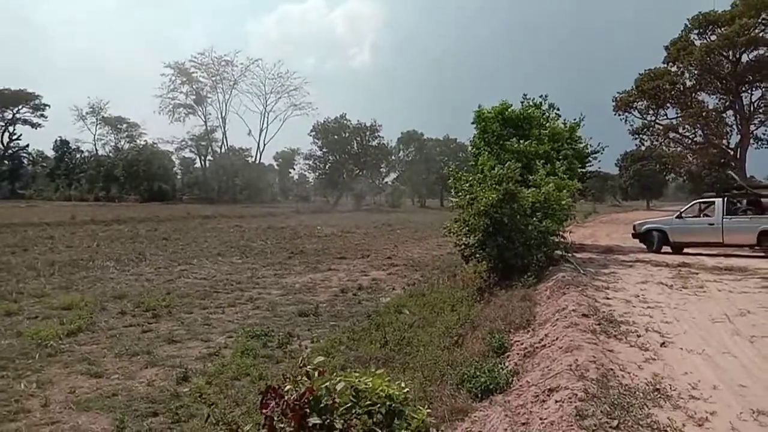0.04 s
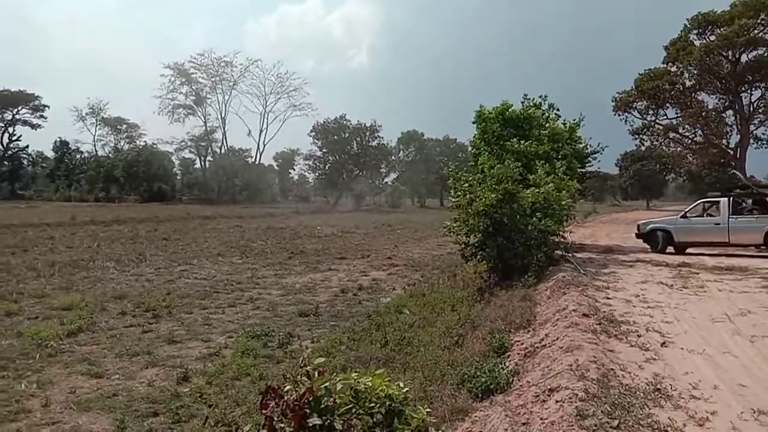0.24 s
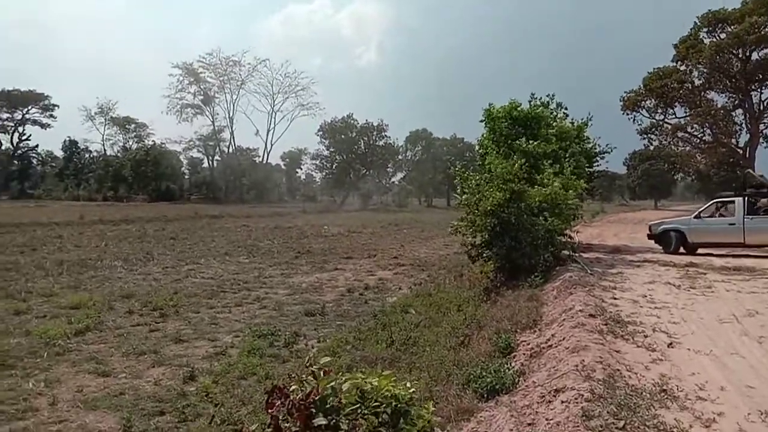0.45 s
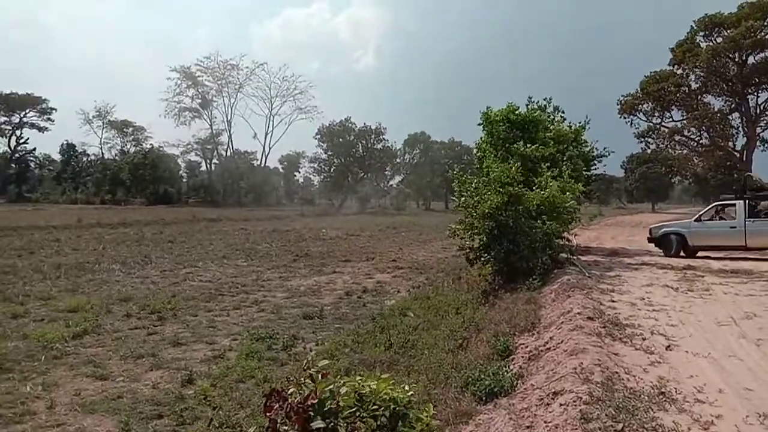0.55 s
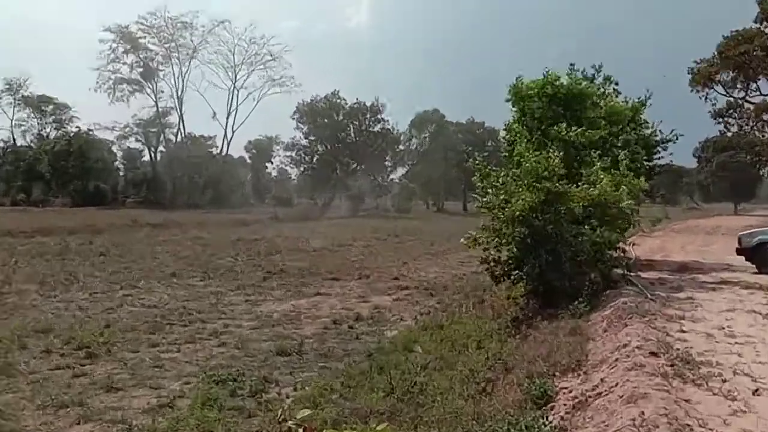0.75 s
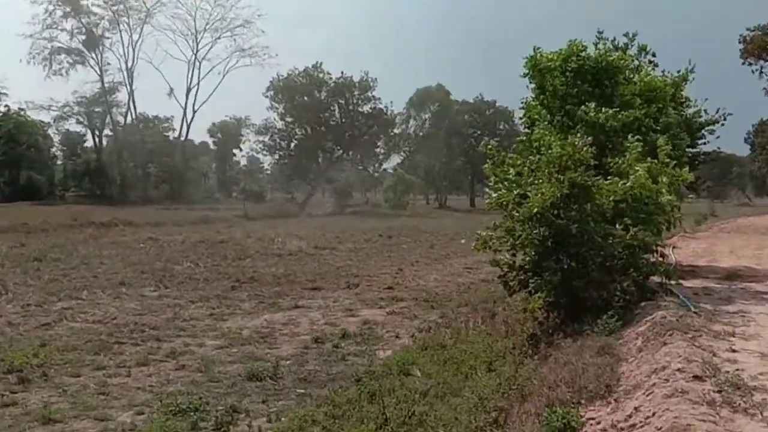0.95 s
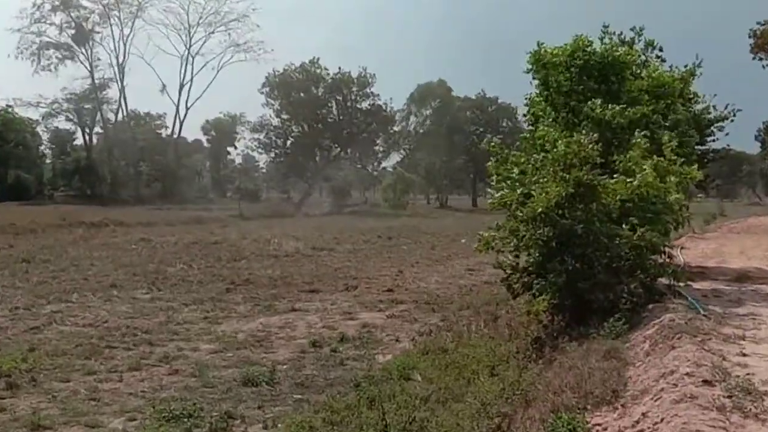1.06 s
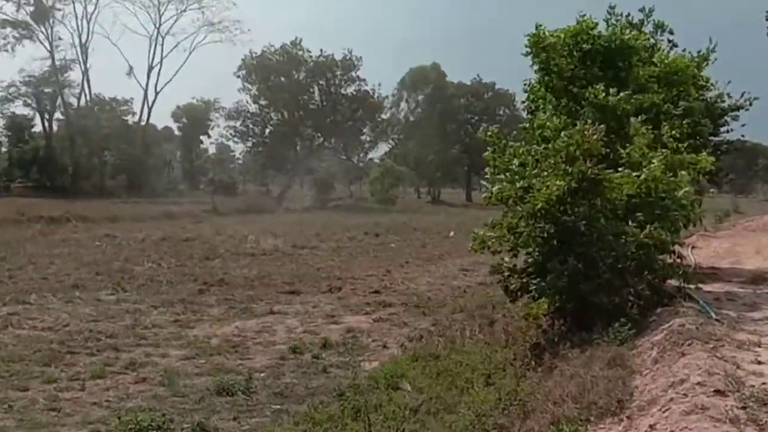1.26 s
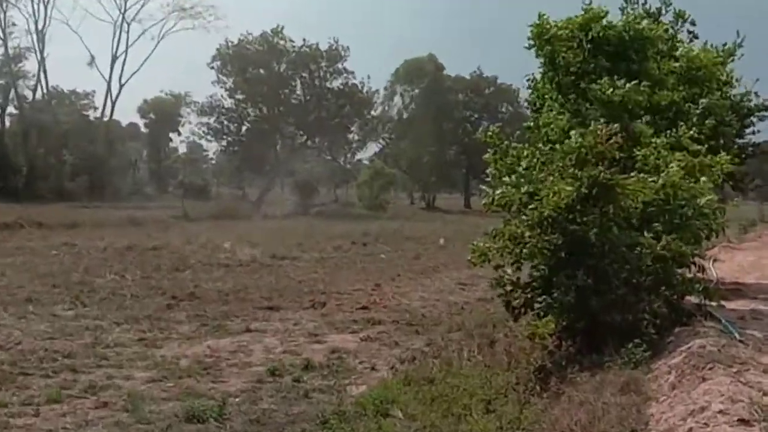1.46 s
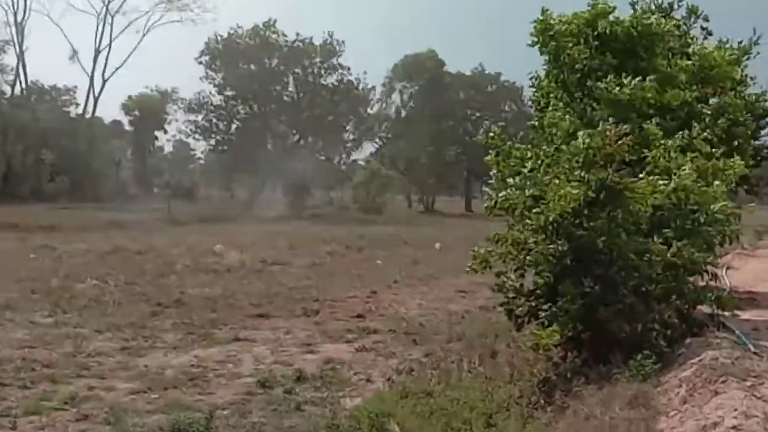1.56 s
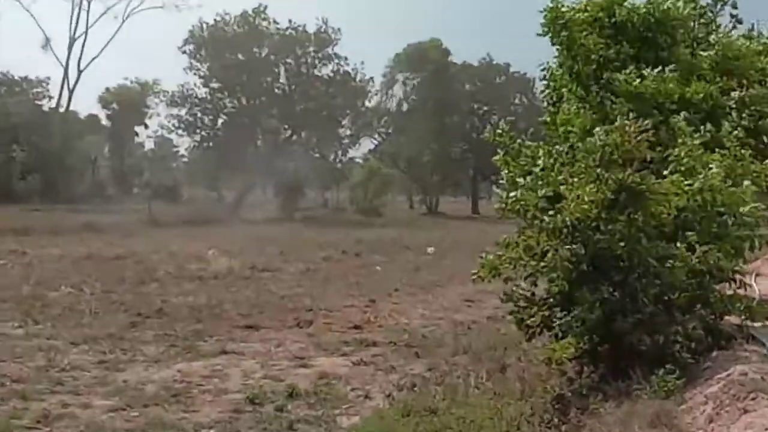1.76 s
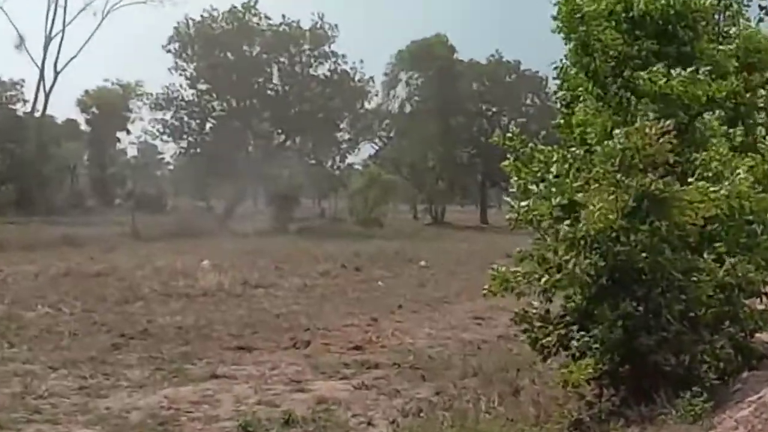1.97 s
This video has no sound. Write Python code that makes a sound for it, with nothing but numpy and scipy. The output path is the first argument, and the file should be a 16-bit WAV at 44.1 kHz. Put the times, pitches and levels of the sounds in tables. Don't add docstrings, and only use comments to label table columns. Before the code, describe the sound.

Close by in an open field, a small motor is blipped with bright valve ticks, then idles slowly with dull booms, metallic clacks and faint hiss, while irregular wind rumble on the phone microphone dies away.

```python
import sys
import numpy as np
from scipy import signal
from scipy.io import wavfile
from scipy.ndimage import uniform_filter1d

SR = 44100
rng = np.random.default_rng(int(sys.argv[2]) if len(sys.argv) > 2 else 0)


def put_to_file(sound):
    columns = np.atleast_2d(sound).T
    safe = np.clip(columns, -1, 1)
    whole_steps = np.round(safe * 32767)
    wavfile.write(sys.argv[1], SR, whole_steps.astype(np.int16))


def field_ratio(decibels):
    return 10 ** (np.asarray(decibels, dtype=float) / 20)


N = 89170

# time in seconds, level in dB.
FLOW_LEVEL = [(0, -26), (.3, -31), (.6, -31), (.75, -31), (.87, -35), (1.0, -33.5), (1.2, -38.5),
              (1.4, -44), (1.66, -46), (1.8, -50), (2.02, -53.5)]
# pitch in Hz, width in Hz, level in dB.
FLOW_MODES = [(53, 21.6, -5), (98.8, 25.6, 2), (136.5, 33.8, 1.5), (200.7, 30, -9.5), (276, 65, -16.5),
              (345.4, 145, -24)]
# crest in seconds, length in seconds, level in dB, eddies per second, sharpness in dB.
GUST_EVENTS = [(0.076, .056, -34, 76, -12), (0.098, 0.014, -25, 250, -8), (.252, .014, -29.5, 142, -8),
               (.316, .012, -29, 150, -5), (0.387, 0.014, -24.5, 210, -13), (.41, 0.02, -19.5, 173, -14.5),
               (0.422, 0.022, -13, 103, -16.5), (0.444, 0.015, -21.5, 96, -7.5),
               (.484, 0.028, -23.5, 167, -21), (0.509, 0.034, -27.5, 92, -20), (.667, 0.023, -30, 122, -3),
               (0.68, 0.0096, -20.5, 170, -23), (0.69, 0.02, -17.5, 73.4, -13.5),
               (0.709, 0.0073, -22, 237, -27), (0.744, 0.11, -42, 100, -3), (.793, 0.013, -19.5, 125, -21),
               (.806, 0.019, -16.5, 127, -11.5), (0.82, .01, -22.5, 170, -23),
               (0.833, 0.041, -19.5, 78.4, -15.5), (0.845, 0.0075, -28.5, 196, -20),
               (0.898, .014, -25.5, 213, -12), (0.914, 0.0164, -23, 200, -25),
               (0.92, 0.0086, -20.5, 93, -13), (.931, 0.024, -15, 76, -33), (0.943, 0.0125, -21, 125, -16),
               (1.043, 0.013, -22.5, 180, -14), (1.057, 0.013, -20, 106, -27),
               (1.077, .014, -19.5, 119, -29), (1.1, .036, -23, 122, -26), (1.131, .022, -25.5, 100, -31),
               (1.352, 0.014, -24, 103, -29), (1.39, 0.028, -36, 104, -42), (1.463, 0.037, -31.5, 63, -21),
               (1.546, 0.013, -27, 100, -31), (1.573, 0.03, -20.5, 97, -36),
               (1.597, 0.016, -25.5, 135, -24), (1.619, 0.01, -24.5, 105, -25)]
# start in seconds, level in dB.
FIRING_EVENTS = [(0, -28), (0.048, -31), (0.119, -29.5), (0.182, -25.5), (.245, -33), (0.313, -25.5),
                 (.372, -25.5), (0.434, -34), (0.474, -29.5), (0.501, -36), (0.571, -31.5), (.64, -32),
                 (0.785, -33), (0.896, -27.5), (.975, -34), (1.07, -28), (1.141, -37.5), (1.242, -29),
                 (1.434, -31), (1.577, -31.5), (1.639, -41.5), (1.74, -34), (1.889, -34)]
# time in seconds, level in dB.
RATTLE_LEVEL = [(0, -43.5), (.1, -56.5), (.3, -45), (.42, -45), (.62, -50), (.8, -50), (.93, -53.5),
                (1.08, -50), (1.3, -47), (1.5, -46), (1.83, -48.5), (2.02, -49)]
# pitch in Hz, width in Hz, level in dB.
CASING_MODES = [(253, 41.4, 4.5), (463, 103, -1.5), (680, 114, -19), (920, 91, -5), (1328, 158, 1.5),
                (1800, 114, 3), (2380, 290, -10), (3154, 280, -10.5), (3730, 353, -3), (5410, 510, -9.5),
                (7106, 980, -4.5), (9260, 1200, -15), (9860, 2800, -19.5), (15000, 470, -24.5)]
# start in seconds, peak level in dB, pitch in Hz, upper panel ring in dB.
CLACK_EVENTS = [(0.014, -38, 1520, 2), (0.247, -36.5, 1260, 8.5), (0.365, -35.5, 880, -28),
                (0.366, -32, 1250, -25), (0.376, -31.5, 1880, -15), (0.392, -36, 620, -20),
                (0.44, -34.5, 1920, -2), (0.507, -34, 1830, -34), (0.572, -38, 1340, 1),
                (0.611, -33, 1800, -3.5), (0.683, -42, 1860, -20), (0.719, -33.5, 1980, -3.5),
                (0.731, -39, 1960, -3), (0.852, -39.5, 2000, -32), (0.895, -34, 2060, -9),
                (0.905, -41, 2310, -12), (0.943, -48, 1800, -20), (0.963, -43, 1220, -8),
                (1.076, -39, 1790, -21), (1.12, -35.5, 1850, -33), (1.16, -35.5, 1760, -30),
                (1.205, -35.5, 1800, -30), (1.241, -33.5, 1850, -6), (1.267, -37, 3730, -20),
                (1.282, -35, 1810, -3), (1.318, -30, 1793, -23), (1.395, -32, 1790, -18),
                (1.402, -36, 1330, -10), (1.445, -44.5, 1480, 5.5), (1.433, -35.5, 1390, 0.5),
                (1.434, -33.5, 1900, -1), (1.484, -37.5, 950, -25), (1.545, -45, 2020, -11),
                (1.578, -40, 880, -28), (1.581, -37, 1400, -13), (1.582, -33, 1800, -1.5),
                (1.63, -55, 940, -20), (1.654, -36.5, 1850, -14), (1.688, -39, 500, -25),
                (1.727, -35.5, 1390, -1), (1.728, -38.5, 902, -15), (1.77, -40.5, 1310, -29),
                (1.8, -51, 1320, -18), (1.846, -38, 1800, -17), (1.875, -35.5, 1400, -1.5),
                (1.952, -39.5, 1450, 1), (1.987, -38, 1850, 2.5)]
# start in seconds, peak level in dB, pitch in Hz, upper ring in dB.
TICK_EVENTS = [(0.047, -41, 5880, 6), (0.0808, -44, 5670, 9), (0.181, -42, 5120, 1),
               (0.2128, -35.5, 5360, 5), (0.2462, -25.5, 5700, -3), (0.2776, -29.5, 5550, -3),
               (0.3098, -25.5, 6220, 1), (0.3417, -32.5, 5570, -0.5), (0.3755, -27.5, 5480, 0.5),
               (0.406, -41, 5610, 1), (0.4381, -37.5, 5410, 5), (0.4708, -40, 5790, -10),
               (0.5022, -30.5, 5470, 1), (0.5352, -47, 5280, 11), (0.5697, -40, 5740, 4),
               (0.6425, -42, 6030, 6.5), (0.7183, -45, 5870, 8), (0.8051, -42, 5660, 3),
               (0.8939, -39, 6060, 5), (1.0755, -47, 5560, 6.5), (1.1199, -44.5, 5470, -1),
               (1.1613, -38.5, 5500, -13), (1.2401, -52, 5620, 1), (1.2664, -43, 5300, 5),
               (1.319, -44.5, 5660, 4.5), (1.5041, -48, 5540, 12), (1.5968, -47, 5980, 9.5),
               (1.6567, -52, 4970, 4)]
# time in seconds, level in dB.
BLIP_LEVEL = [
    (.06, -46),
    (.09, -33),
    (.11, -34),
    (.125, -28.5),
    (.16, -24),
    (.19, -28),
    (.21, -31.5),
    (.265, -35),
    (.32, -47.5),
]
# pitch in Hz, width in Hz, level in dB.
INTAKE_MODES = [(369, 203, 5.5), (497.6, 149, 7), (791, 476, 1.5), (1306, 160, -3), (1444, 1080, -10),
                (2386, 200, -10), (3390, 1500, -13), (5350, 1500, -13.5), (6780, 920, -13.5),
                (8400, 2800, -28), (14900, 1000, -27.5)]
# start in seconds, level in dB.
PUFF_EVENTS = [(0.857, -50), (0.932, -54), (0.976, -48), (1.126, -56), (1.262, -61), (1.333, -50.5),
               (1.389, -45.5), (1.465, -48.5), (1.513, -42.5), (1.642, -46), (1.768, -43.5), (1.845, -57),
               (1.906, -48.5)]
# pitch in Hz, width in Hz, level in dB.
PUFF_MODES = [(6970, 1700, 4), (9540, 2900, -4.5), (11500, 4500, -26), (15200, 900, -17)]


def unit(x):
    return x / np.sqrt(np.mean(x ** 2) + 1e-18)


def curve(table):
    table = np.array(table)
    return field_ratio(np.interp(np.arange(N) / SR, table[:, 0], table[:, 1]))


def band(x, hz, width):
    upper = hz + width / 2
    edges = np.clip([hz * hz / upper, upper], 10, SR / 2.2)
    return signal.sosfilt(signal.butter(2, edges, "band", fs=SR, output="sos"), x)


def walk(rate):
    hold = int(SR / rate)
    steps = rng.standard_normal(400)[np.arange(N) // hold % 400]
    slewed = uniform_filter1d(uniform_filter1d(steps, hold), hold)
    return unit(slewed - uniform_filter1d(slewed, 5 * hold))


def rings(x, modes, flicker_db, rate):
    total = np.zeros(N)
    for hz, width, db in modes:
        total += field_ratio(db + flicker_db * walk(rate)) * band(x, hz, width)
    return unit(total)


def add(out, start, x):
    i = max(int(start * SR), 0)
    out[i:i + len(x)] += x[:N - i]


def wind_rumble():
    flow = rings(rng.standard_normal(N), FLOW_MODES, 2.06, 9.14)
    return curve(FLOW_LEVEL) * field_ratio(0.28 * walk(15.86)) * flow


def wind_buffets():
    out = np.zeros(N)
    wobble = walk(60)
    grit = unit(band(rng.standard_normal(N), 250, 120))
    for crest_s, length_s, db, rate, sharp_db in GUST_EVENTS:
        start = crest_s - 0.8 * length_s
        n = np.arange(int(length_s * 1.576 * SR))
        at = np.clip(n + int(start * SR), 0, N - 1)
        phase = 2 * np.pi * np.cumsum(rate * (1 + 0.079 * wobble[at])) / SR
        phase = phase - phase[len(n) // 2] + np.pi / 2 - 128 / rate
        sharp = field_ratio(sharp_db)
        crest = np.sin(phase) - 0.14 * np.cos(2 * phase) - 0.19 * sharp * np.sin(3 * phase)
        rough = 0.58 * sharp * grit[at] * (1 + 0.83 * np.sin(phase))
        add(out, start, 1.106 * field_ratio(db) * np.hanning(len(n)) * (crest + rough))
    return out


def exhaust():
    out = np.zeros(N)
    boom_hz, idle_from_s = 145.7, 0.7
    for start, db in FIRING_EVENTS:
        length_s, skew = (0.058, 0.31) if start < idle_from_s else (0.043, 0.73)
        u = np.arange(int(length_s * SR)) / (length_s * SR)
        swell = np.sin(np.pi * u ** skew) ** 0.65
        add(out, start, 1.27 * field_ratio(db) * swell * np.sin(2 * np.pi * boom_hz * length_s * u))
    return out


def casing_rattle():
    grain = rng.standard_normal(N) * field_ratio(2.22 * walk(45.46))
    return curve(RATTLE_LEVEL) * rings(grain, CASING_MODES, 2.4, 16.54)


def knocks(table, rise_s, decay_s, spread, upper, snap, broad, trim_db):
    out, t = np.zeros(N), np.arange(3000) / SR
    envelope = np.exp(-t / decay_s) * (1 - np.exp(-t / rise_s))
    for start, db, hz, upper_db in table:
        burst = rng.standard_normal(len(t)) * envelope + snap * (t == 0)
        narrow = unit(band(burst, hz, spread * hz))
        hit = narrow + broad * unit(band(burst, hz, 4 * spread * hz))
        hit = hit / np.max(np.abs(hit))
        top = sum(field_ratio(mode_db) * unit(band(burst, f, width)) for f, width, mode_db in upper)
        top = top / np.max(np.abs(top))
        add(out, start, field_ratio(db + trim_db) * (hit + field_ratio(upper_db) * top))
    return out


def casing_clacks():
    return knocks(CLACK_EVENTS, rise_s=0.0006, decay_s=0.011, spread=0.17, upper=[(2397, 510, 0.1)],
                  snap=7.1, broad=0.17, trim_db=-3.58)


def valve_ticks():
    upper = [(6800, 1300, 0.1), (8500, 900, -9), (3550, 500, -9)]  # Hz, width Hz, dB
    return knocks(TICK_EVENTS, rise_s=0.00063, decay_s=0.0046, spread=0.12, upper=upper,
                  snap=2.5, broad=0.044, trim_db=-1.55)


def throttle_blip():
    rasp = rng.standard_normal(N) * field_ratio(0.4 * walk(90))
    level = curve(BLIP_LEVEL)
    body_lead_s, opens_s, rise_s = 0.014, 0.1103, 0.013
    body = np.roll(level, -int(body_lead_s * SR)) * rings(rasp, INTAKE_MODES[:3], 1.5, 30)
    opened = np.clip((np.arange(N) / SR - opens_s) / rise_s, 0.2, 1)
    bright = opened * level * rings(rasp, INTAKE_MODES[3:], 0.8, 31.64)
    return field_ratio(-5.5) * (body + bright)


def idle_puffs():
    gate, length_s = np.zeros(N), 0.028
    for start, db in PUFF_EVENTS:
        add(gate, start, field_ratio(db) * np.hanning(int(length_s * SR)))
    return gate * rings(rng.standard_normal(N), PUFF_MODES, 3.0, 40.95)


def engine():
    metal = casing_rattle() + valve_ticks() + idle_puffs()
    metal = metal - 0.6 * band(metal, 4500, 550)
    return exhaust() + casing_clacks() + throttle_blip() + metal


def scene():
    return (wind_rumble() + wind_buffets() + engine())[None]


def band_limit(x):
    return signal.sosfilt(signal.butter(12, 16730, fs=SR, output="sos"), x)


def record(dry):
    low_cut = signal.butter(3, 62, "high", fs=SR, output="sos")
    top_cut = signal.ellip(12, 0.3, 60, 15640, fs=SR, output="sos")
    mix = signal.sosfilt(top_cut, signal.sosfilt(low_cut, dry))
    return band_limit(mix)


dry = scene()
out = record(dry)
put_to_file(out)
```